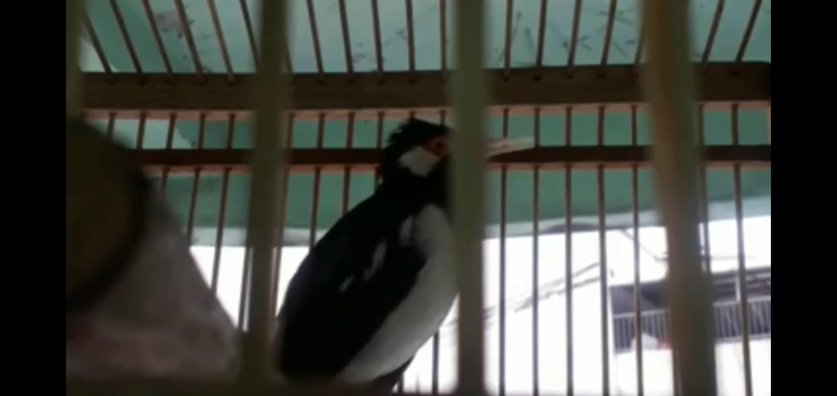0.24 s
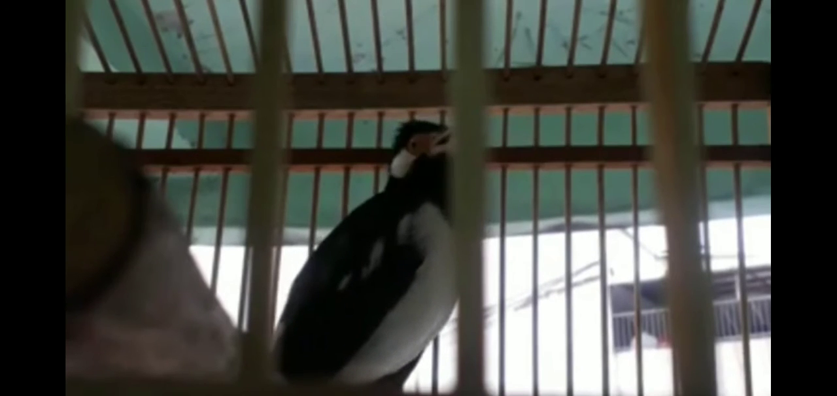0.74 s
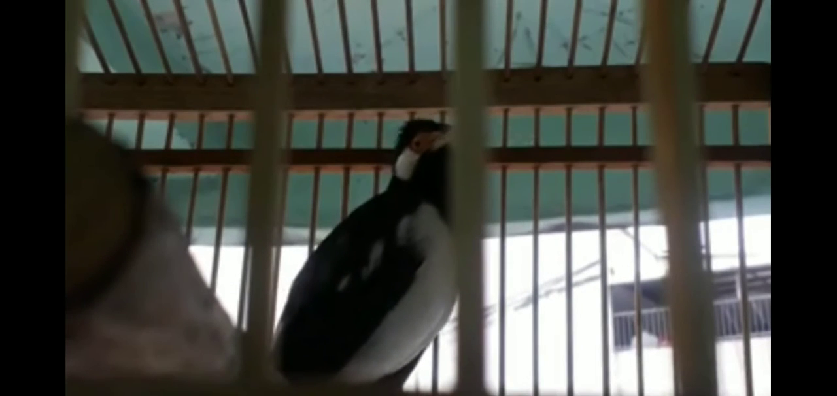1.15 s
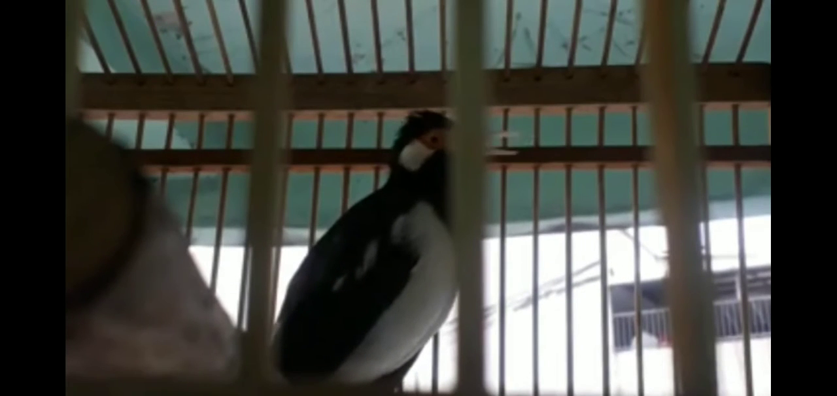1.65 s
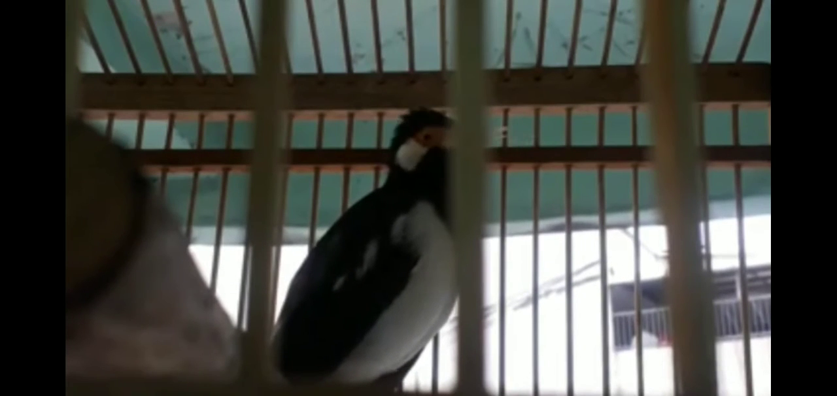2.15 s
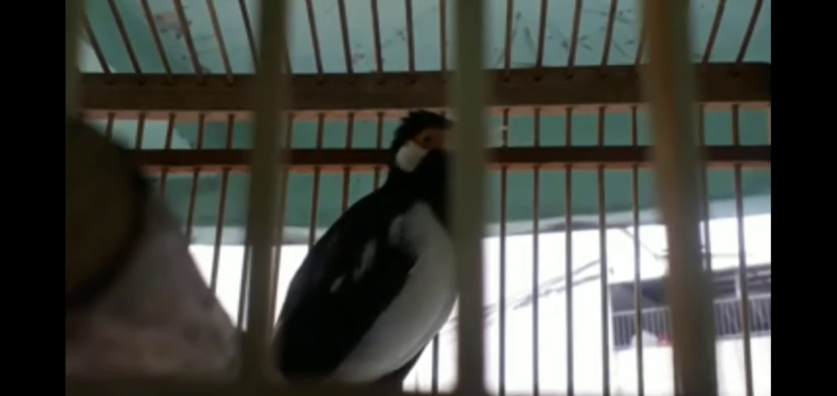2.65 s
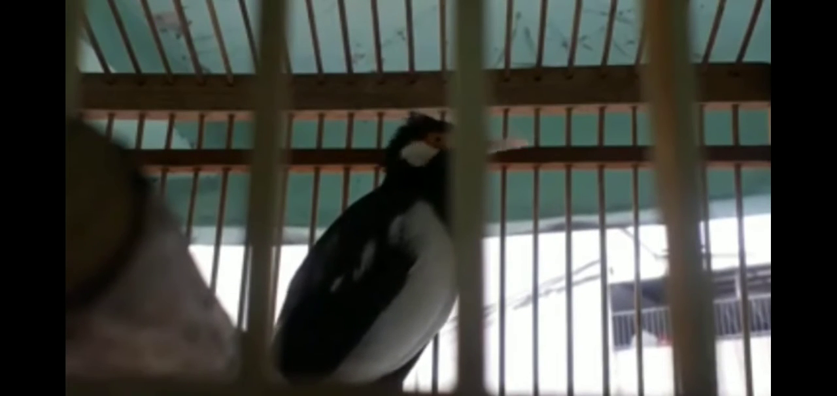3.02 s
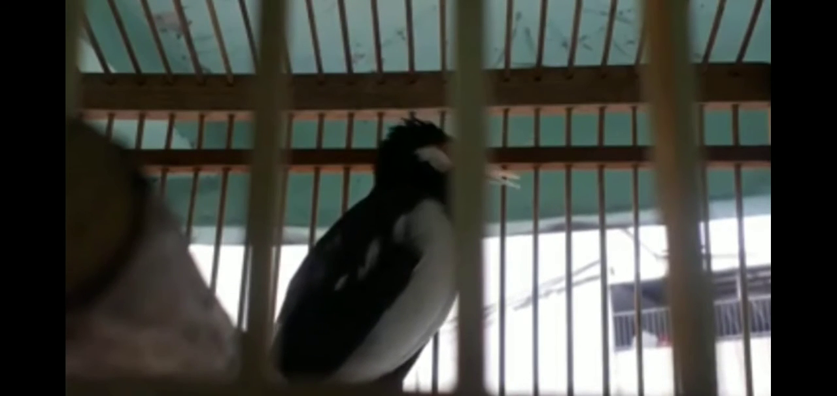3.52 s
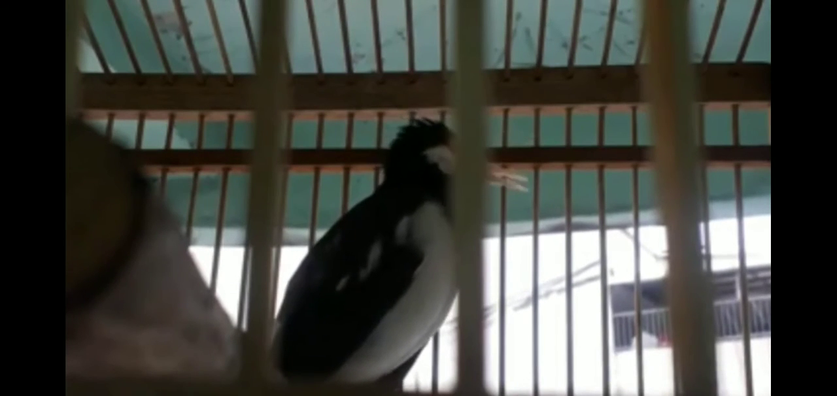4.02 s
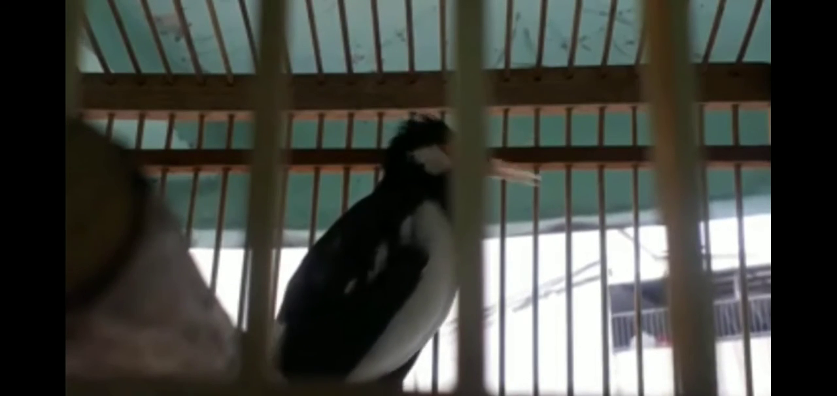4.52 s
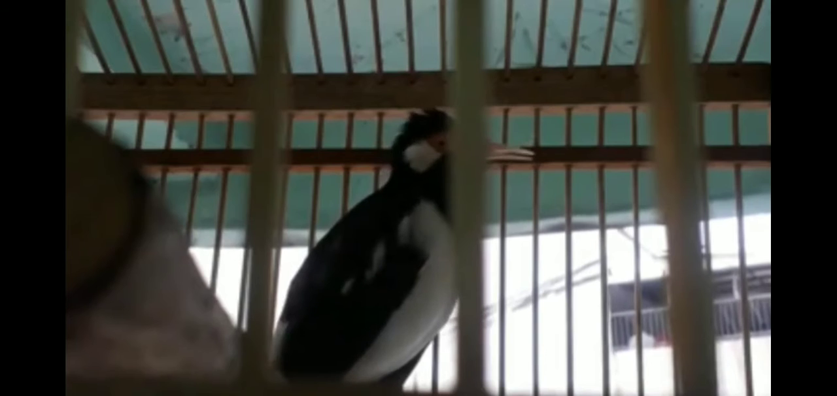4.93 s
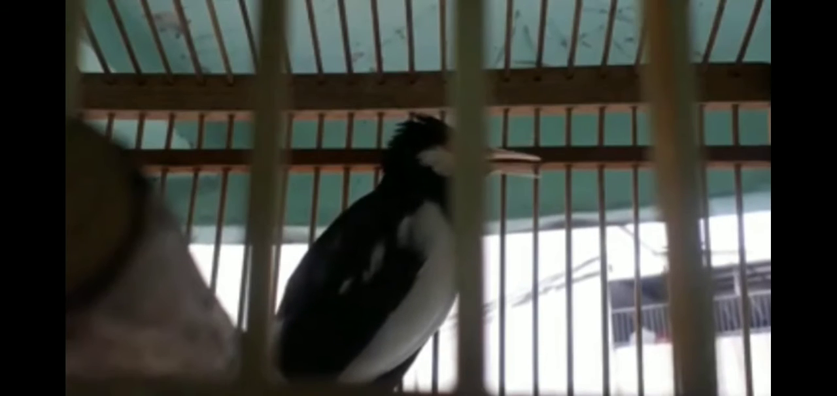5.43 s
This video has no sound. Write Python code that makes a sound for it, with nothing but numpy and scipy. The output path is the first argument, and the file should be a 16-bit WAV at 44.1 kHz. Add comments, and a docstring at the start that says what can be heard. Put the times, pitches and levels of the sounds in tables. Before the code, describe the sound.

A caged starling close by sings whistles, chatter, beak clicks, rattles and trills while a dog barks hoarsely in the distance over low town hum.

```python
"""A walled yard under a low town hum, where a caged starling sings close to a phone and a dog barks further off.
The song is swept tones from the syrinx: whistles, glides, chatter, rattles and trills, with ringing beak clicks.
The hoarse barks are uneven pulses through muzzle resonances, the hum is shaped noise, and the walls ring after notes.
The phone samples at 48 kHz and drops samples to reach 44.1 kHz, which mirrors tones around multiples of 3.9 kHz."""
import sys
import numpy as np
from scipy import signal
from scipy.fft import rfft, irfft
from scipy.io import wavfile
from scipy.ndimage import uniform_filter1d

SR = 44100
rng = np.random.default_rng(int(sys.argv[2]) if len(sys.argv) > 2 else 0)


def store_pcm(level_fs):
    """Save levels as 16-bit WAV."""
    pcm = np.round(np.clip(level_fs, -1, 1) * 32767).astype(np.int16)
    wavfile.write(sys.argv[1], SR, np.atleast_2d(pcm).T)


N = 249606
T = np.arange(N) / SR


def undb(db):
    """Level law: 20 dB is a factor of ten in amplitude."""
    return 10 ** (np.asarray(db) / 20)


def band(x, hz, width_hz):
    """Two-pole resonance: gain 1 at the centre, falling off over the given bandwidth."""
    return signal.lfilter(*signal.iirpeak(hz, hz / width_hz, fs=SR), x)


def walk(rate_hz):
    """Slow random modulation: levels held for one period and averaged twice; spread near 0.3."""
    hold = int(SR / rate_hz)
    steps = np.repeat(rng.standard_normal(N // hold + 1), hold)
    return 0.38 * uniform_filter1d(uniform_filter1d(steps, hold), hold)[:N]


def add(out, start_s, x):
    """Superposition: sounds that overlap in time sum their pressures."""
    i = int(start_s * SR)
    out[i:i + len(x)] += x[:N - i]


def echo(x, first_s, t60_s, db, low_hz, damp_hz=7000):
    """Reverberation: dense reflections decay by 60 dB in t60_s, weaker for the highest and lowest tones."""
    t = T[:SR]
    tail = rng.standard_normal(SR) * 1000. ** (-t / t60_s) * (t > first_s)
    tail /= np.sqrt(np.sum(tail ** 2))
    tail = signal.lfilter(*signal.butter(1, [low_hz, damp_hz], "band", fs=SR), tail)
    return undb(db) * signal.fftconvolve(x, tail)[:N]


def town():
    """Spectral shaping of noise: distant traffic and leaves in bands that swell together and flicker alone."""
    # Relative spectrum of the hum: frequency_hz, density_db (per Hz)
    spectrum = [(25, -12.5), (50, -11), (75, -1.5), (130, 2.5), (250, -3), (600, -8), (1300, -4.5),
                (2000, -19.5), (3500, -25.5), (8000, -34.5), (16000, -45)]
    rms_db = -54
    hz_points, db_points = np.transpose(spectrum)
    octave = np.log2(np.arange(N // 2 + 1) * SR / N + 1)
    weight = undb(np.interp(octave, np.log2(hz_points), db_points))
    noise = rfft(rng.standard_normal(N)) * weight
    out, swell = 0, walk(0.2)
    for centre in np.arange(4, 14.6, .5):  # overlapping bands, half an octave apart
        share = np.clip(1 - 2 * np.abs(octave - centre), 0, 1)
        level = undb(.8 * swell + 4.5 * walk(16))
        out = out + level * irfft(noise * share, N)
    return out * undb(rms_db) / np.sqrt(np.mean(out ** 2))


def bark(length_s, pitch_hz):
    """Source and filter: uneven vocal pulses and breath ring in the muzzle; the result has unit RMS."""
    # Muzzle resonances: centre_hz, width_hz (of the first pass), gain_db
    muzzle = [(815, 136, -2.5), (983.6, 76, 7), (1168, 160, -2.5), (1565, 89, -9.5), (2130, 1400, -21.5)]
    t = T[:int(length_s * SR)]
    wobble = 1 + .6 * uniform_filter1d(rng.standard_normal(len(t)), size=200)
    cycles = np.cumsum(pitch_hz * wobble) / SR
    pulses = np.diff(np.floor(cycles), prepend=-1)  # one pulse per whole cycle
    pulses *= undb(4.0 * rng.standard_normal(len(t)))
    breath = .09 * rng.standard_normal(len(t))
    burst = 1 + 0.63 * np.exp(-t / 0.0026)  # the bark bursts out, then holds
    effort = burst * np.clip(np.minimum(t / 0.0015, (length_s - t) / 0.055), 0, 1)
    source = np.pad(effort * (pulses + breath), (0, 2000))  # room to ring out
    voice = 0
    for k, (hz, width, db) in enumerate(muzzle):
        ring = band(band(source, hz, width), hz, 2.1 * width)
        voice = voice + (-1) ** k * undb(db) * ring  # neighbours in opposite phase
    return voice / np.sqrt(np.mean(voice ** 2))


def dog():
    """Propagation loss: fences and air thin the barks, and distance leaves mostly echo."""
    # Barks: start_s, level_db (RMS before the thinning), length_s, pitch_hz (mean, before the wobble)
    barks = [(0.207, -28.5, 0.12, 255), (0.641, -31.5, 0.14, 255.6), (0.974, -33, 0.13, 259.3),
             (1.259, -32.5, 0.12, 255.7), (3.889, -39, .17, 251.4), (4.984, -37, 0.16, 253.2),
             (5.514, -51, .1, 265)]
    # Echo of the distant barks: first_return_s, t60_s, level_db (before its filter), low_edge_hz
    far_echo = (.004, .7, 1.5, 300)
    out = np.zeros(N)
    for start_s, db, length_s, hz in barks:
        add(out, start_s, undb(db) * bark(length_s, hz))
    out = signal.sosfilt(signal.butter(2, [720, 3200], "band", fs=SR, output="sos"), out)
    return out + echo(out, *far_echo, damp_hz=2970)


def click(db):
    """Impulse response: two quick contacts of the beak ring its short resonances, to a peak of db."""
    # Beak resonances: centre_hz, width_hz (of each of two passes), gain_db
    beak = [(1910, 1170, 10), (2480, 490, 7.5), (3780, 760, -17.5)]
    hit = np.zeros(600)
    hit[[0, 75]] = .6, 1  # contacts 1.7 ms apart
    ring = sum(undb(gain) * band(band(hit, hz, width), hz, width) for hz, width, gain in beak)
    return undb(db) * ring / np.abs(ring).max()


def splutter(db, decay_s=0.017):
    """Turbulence: the plunge of a chatter note breaks up into a grainy, resonant burst of air."""
    t = T[:1500]
    grain_levels = np.repeat(rng.standard_normal(50), 30)
    grains = rng.standard_normal(len(t)) * undb(4.7 * grain_levels)
    upper = band(band(grains, 3600, 2020), 2600, 2010)
    lower = band(band(grains, 2100, 1710), 2100, 1710)
    envelope = np.minimum(t / 0.00031, 1) * np.exp(-t / decay_s)
    return undb(db) * envelope * (upper + 0.81 * lower)


def note(rows, fourth_db=-7.0, edge_s=.002):
    """Harmonic oscillation: the syrinx membrane swings almost as a sine; at low pitch it snaps into overtones."""
    # Pitches that leave throat and cage stronger or weaker: frequency_hz, gain_db
    carry = [(1750, 2.5), (2050, 4), (2350, -2), (2700, -1), (2980, -11), (3250, 3), (3600, -10), (3950, 3),
             (4350, -11), (4750, -4.5), (5400, -22.5), (6200, 7.5)]
    s, hz, db, *over = np.transpose(rows)
    t = np.arange(s[0], s[-1], 1 / SR)

    def smooth(column):
        """Interpolation: straight lines between the rows, with rounded corners."""
        return uniform_filter1d(np.interp(t, s, column), size=130, mode="nearest")

    pitch = smooth(hz)
    phase = 2 * np.pi * np.cumsum(pitch) / SR
    tone = np.sin(phase)
    if over:
        second, third = (undb(smooth(column)) for column in over)
        tone += second * np.sin(2 * phase)
        tone += third * (np.sin(3 * phase) + undb(fourth_db) * np.sin(4 * phase))
        slack = np.clip((1250 - pitch) / 450, 0, 1)  # the slack membrane beats unevenly
        tone *= 1 + 2.2 * slack * uniform_filter1d(rng.standard_normal(len(t)), size=14)
    else:
        tone += undb(-26.5) * np.sin(2 * phase)
        tone *= undb(np.interp(pitch, *np.transpose(carry)))
    edges = np.clip(np.minimum(t - s[0], s[-1] - t) / edge_s, 0, 1)
    return np.sqrt(2) * undb(smooth(db)) * edges * tone


def dive(start_s, length_s, top_hz, floor_hz, sink_s, db):
    """Exponential relaxation: pitch sinks ever more slowly to a floor, loudest part of the way down."""
    u = np.arange(25) / 24
    pitch = floor_hz + (top_hz - floor_hz) * np.exp(-u * length_s / sink_s)
    level = db + np.interp(u, [0, 0.22, 1], [-7.5, 0, -2.5])
    return np.c_[start_s + u * length_s, pitch, level]


def pip(length_s, first_hz, mid_hz, last_hz, db, rise, fall, rasp, second_db, haste=0.91):
    """Frequency modulation: one puff of air bends through three pitches while it swells and dies."""
    u = np.arange(int(length_s * SR)) / (length_s * SR)
    curve = np.polyfit([0, .5, 1], [first_hz, mid_hz, last_hz], deg=2)
    bend = np.polyval(curve, u ** haste)  # haste under 1: the bend comes early
    phase = 2 * np.pi * np.cumsum(bend) / SR
    shape = np.sin(np.pi / 2 * np.clip(np.minimum(u / rise, (1 - u) / fall), 0, 1)) ** 2
    # the membrane loses its beat
    flutter = 1 + rasp * u * uniform_filter1d(rng.standard_normal(len(u)), size=12)
    tone = np.sin(phase) + undb(second_db) * np.sin(2 * phase)
    return np.sqrt(2) * undb(db) * shape * flutter * tone


def sing_whistles(out):
    """Continuous phonation: steady air keeps the membrane swinging through whistles, glides and dives."""
    # Whistles, short and long, one table a note: time_s, pitch_hz, level_db (before the carry)
    whistles = [
        [(0.766, 3970, -23), (0.772, 4684, -18), (0.78, 4920, -23), (0.82, 4360, -27.5), (0.86, 4158, -28),
         (0.926, 4044, -31.5), (0.942, 3780, -29), (0.96, 3075, -19), (0.978, 2560, -24), (0.984, 2370, -32)],
        [(1.517, 2127, -31.5), (1.522, 2497, -36), (1.532, 3834, -19), (1.54, 4065, -23), (1.549, 4076, -19.5),
         (1.562, 2544, -20.5), (1.565, 2580, -36)],
        [(1.632, 2575, -25), (1.64, 3300, -29.5), (1.651, 3883, -24), (1.66, 3890, -18), (1.666, 3420, -19.5),
         (1.675, 3100, -24.5), (1.685, 3240, -37)],
        [(2.987, 4775, -21), (2.999, 4633, -17), (3.008, 4104, -23.5), (3.014, 3360, -52), (3.021, 3280, -21),
         (3.028, 2950, -35), (3.036, 2740, -40), (3.046, 2670, -22.5)],
        [(3.094, 3870, -24), (3.101, 3970, -22), (3.107, 3800, -42), (3.114, 3260, -24), (3.123, 3130, -23.5),
         (3.131, 2930, -48), (3.144, 2970, -1)],
        [(3.3, 2904, -52), (3.315, 2905, -22.5), (3.354, 2688, -27), (3.388, 2698, -16), (3.4, 2666, -21.5),
         (3.407, 2280, -25.5)],
        [(3.846, 1896, -36), (3.858, 3843, -21.5), (3.868, 3940, -25), (3.882, 3787, -24), (3.896, 2686, -19.5),
         (3.913, 2346, -19), (3.928, 2183, -45), (3.94, 2113, -30.5), (3.968, 2650, -27.5), (3.98, 3190, -16),
         (3.991, 3385, -23), (4.013, 2990, -21.5), (4.023, 2530, -21.5), (4.045, 2322, -22.5),
         (4.067, 2417, -22.5), (4.085, 2716, -27), (4.094, 3226, -23.5), (4.106, 3115, -14.5),
         (4.126, 3150, -32), (4.145, 2797, -19), (4.165, 2338, -26), (4.178, 2364, -19.5), (4.2, 2000, -41)],
        [(4.664, 2435, -36), (4.675, 2432, -44), (4.7, 2518, -32.5), (4.72, 2408, -34), (4.735, 2393, -33)],
    ]
    # Low glides, one table a note: time_s, pitch_hz, level_db, second_db, third_db (partials over the first)
    glides = [
        [(0.0, 2291, -32.5, 4, -20), (0.029, 2468, -25.5, -17, -50.5), (0.055, 2384, -22.5, -26.5, -49),
         (0.068, 2195, -30.5, -17, -37), (0.074, 1995, -34.5, -11.5, -27), (0.08, 1730, -35.5, -8, -30),
         (0.09, 1576, -40.5, 2.5, -25)],
        [(2.017, 748, -53.5, -5, 5.5), (2.036, 867, -45, 8, 11.5), (2.055, 1006, -33.5, -5, -21),
         (2.097, 1273, -33.5, 15.5, -20.5), (2.118, 1305, -48.5, 20, 5.5), (2.146, 1584, -35.5, 7, -17),
         (2.178, 1908, -28.5, -16, -30.5), (2.19, 2025, -36, -4, -29), (2.217, 2254, -20, -35, -45.5),
         (2.228, 2285, -34.5, -18, -45), (2.241, 2290, -15, -41, -25), (2.255, 2236, -24, -29, -46),
         (2.264, 2285, -20, -33, -49), (2.335, 2479, -15.5, -43, -47), (2.36, 2412, -23.5, -45, -38),
         (2.374, 2517, -28, -31, -45), (2.388, 2546, -13.5, -40, -43), (2.404, 2534, -71, -16, -26)],
    ]
    # Dives: start_s, length_s, top_hz, floor_hz, sinking_time_s, level_db (loudest point, before the carry)
    dives = [(0.753, 0.014, 4310, 2260, 0.012, -21), (0.984, 0.031, 1950, 1610, 0.0091, -30.5),
             (3.408, 0.014, 2063, 1922, 0.0062, -26.5), (3.425, 0.013, 1924, 1666, 0.016, -24),
             (1.772, 0.026, 5950, 3406, 0.017, -15.5), (2.562, 0.076, 6440, 3432, .016, -21),
             (2.715, 0.05, 6350, 3173, 0.016, -23), (3.178, 0.048, 4155, 2627, .022, -24),
             (3.253, 0.049, 4244, 2712, 0.031, -22.5), (5.181, 0.022, 4860, 3900, 0.029, -30)]
    for rows in whistles + glides + [dive(*row) for row in dives]:
        add(out, rows[0][0], note(rows))


def sing_upstrokes(out):
    """Rising tension: faint upward sweeps lead into the next note."""
    # Upstrokes: start_s, length_s, first_hz, last_hz, level_db
    upstrokes = [(0.425, 0.0055, 4630, 5274, -35), (0.558, 0.0072, 4260, 5140, -23.5),
                 (0.749, 0.0089, 2690, 4220, -29.5), (3.047, 0.059, 2450, 5340, -34),
                 (3.149, .03, 2876, 5210, -32), (3.228, .028, 2786, 5280, -37)]
    for start_s, length_s, first, last, db in upstrokes:
        middle = first + .7 * (last - first)  # most of the climb comes early
        add(out, start_s, pip(length_s, first, middle, last, db, rise=.3, fall=0.31, rasp=1.42, second_db=-22.5))


def sing_pips(out):
    """Transient onset: the membrane pops open with a tick at the start of each low pip.

    The pips come in rattles or in short uneven runs."""
    # Low pips: start_s, length_s, pitch_hz (middle), level_db
    pips = [(1.03, 0.023, 1660, -31), (1.306, 0.012, 1050, -28), (1.322, 0.015, 1070, -54),
            (1.347, .017, 1108, -38), (1.365, 0.0081, 1220, -28), (1.387, 0.013, 1194, -28),
            (1.41, 0.016, 1284, -29.5), (3.439, 0.018, 1101, -25), (3.45, 0.026, 1634, -31),
            (3.474, .011, 1069, -26.5), (3.503, 0.011, 885, -37.5), (3.648, 0.0097, 1147, -28.5),
            (3.673, 0.0097, 1185, -31), (3.697, 0.012, 1200, -30.5), (3.721, 0.014, 1150, -32),
            (3.744, 0.015, 1138, -35), (4.202, 0.024, 1723, -26), (4.226, 0.021, 1140, -22.5),
            (4.245, .013, 1670, -29), (4.26, .021, 1069, -25.5), (4.443, 0.0091, 1208, -29.5),
            (4.47, 0.0087, 1174, -28.5), (4.495, 0.012, 1255, -29.5), (4.518, 0.026, 1323, -34),
            (4.55, 0.0053, 1275, -26), (4.579, 0.022, 1495, -31.5), (4.606, 0.022, 1496, -30),
            (4.635, 0.026, 1337, -33), (4.663, 0.011, 1283, -32)]
    for start_s, length_s, hz, db in pips:
        body = pip(length_s, hz * .97, hz, hz * 0.99, db, rise=0.46, fall=0.52, rasp=0.4, second_db=-30.5)
        pop = pip(0.0033, hz * 1.083, hz * 1.083, hz, db - 6, rise=0.38, fall=0.37, rasp=0, second_db=-19)
        for part in (body, pop, click(db - 11.0)):
            add(out, start_s, part)


def sing_trills(out):
    """Periodic gesture: repeated strokes dive and curl up; most low ones get a faint rising answer."""
    # Strokes of each trill: start_s, top_hz, lowest_hz (mid-bend), level_db
    low_trill = [(5.202, 4570, 4266, -30), (5.215, 4400, 4140, -23.5), (5.237, 4390, 3953, -22),
                 (5.26, 4570, 3975, -24.5), (5.284, 4520, 3977, -22), (5.311, 4444, 3983, -22.5),
                 (5.337, 4480, 3990, -21.5), (5.365, 4440, 3970, -20), (5.393, 4455, 4100, -27)]
    high_trill = [(5.488, 6130, 4620, -33), (5.514, 5990, 4760, -26), (5.544, 5500, 4810, -23.5),
                  (5.573, 5504, 4713, -22), (5.603, 5734, 4896, -26.5), (5.633, 5950, 4850, -25.5)]
    for start_s, top, hz, db in low_trill:
        add(out, start_s, pip(0.0161, top, hz, 1.008 * hz, db, rise=0.13, fall=0.7, rasp=0.085,
                              second_db=-30, haste=0.854))
    for start_s, top, hz, db in high_trill:
        add(out, start_s, pip(.033, top, hz, 1.09 * hz, db, rise=0.23, fall=0.33, rasp=0.41,
                              second_db=-30, haste=.9))
    for start_s, *_, db in low_trill[1:-1]:
        add(out, start_s + .015, pip(.012, 4110, 4410, 4470, db - 12.5, rise=0.25, fall=0.28, rasp=.1,
                                     second_db=-22))


def sing_chatter(out):
    """Loss of oscillation: a high tone plunges, then breaks up into a burst of air."""
    # Chatter notes: start_s, length_s, top_hz, level_db (of the tone)
    chatter = [(0.297, 0.017, 5400, -28), (.362, 0.019, 5250, -24.5), (.431, .019, 5050, -21.5),
               (0.494, 0.031, 5700, -24), (.564, .02, 5060, -22), (.631, 0.014, 4920, -25)]
    for start_s, length_s, hz, db in chatter:
        add(out, start_s, pip(length_s, hz, .86 * hz, 1530, db, rise=0.46, fall=0.34, rasp=1.36,
                              second_db=-28, haste=1.1))
        add(out, start_s + .7 * length_s, splutter(db + 4.2))


def starling():
    """Amplitude modulation: an air stream that is never quite even carries the whole dry song."""
    # Beak clicks: start_s, peak_db (before the uneven air stream)
    clicks = [(0.747, -30), (1.2331, -18.5), (2.016, -42), (3.601, -20), (3.843, -27), (4.4015, -20.5)]
    out = np.zeros(N)
    for sing in (sing_whistles, sing_upstrokes, sing_pips, sing_trills, sing_chatter):
        sing(out)
    for start_s, db in clicks:
        add(out, start_s, click(db))
    return out * undb(1.5 * walk(90))


def scene():
    """Direct and reflected sound: the song with its early bounces and echoes joins the dog and the town."""
    # Bounces from cage floor, roof and wall: lag_s, level_db (over the dry song)
    bounces = [(.0014, -9), (.0030, -14), (.0042, -15), (.0094, -15)]
    # Nearby walls, then the open yard beyond: first_return_s, t60_s, level_db (before its filter), low_edge_hz
    echoes = [(.006, 0.166, -5.5, 1850), (0.018, .7, -12.5, 500)]
    bird = starling()
    near = undb(2.0) * bird
    for lag_s, db in bounces:
        add(near, lag_s, undb(db) * bird)
    reverberation = sum(echo(bird, *settings) for settings in echoes)
    return (near + reverberation + dog() + town())[None]


def record(dry):
    """Aliasing: of 48 kHz samples the nearest earlier one is kept for each 44.1 kHz tick; the top is cut."""
    fast = signal.resample_poly(dry, 160, 147, axis=1)
    kept = fast[:, np.arange(N) * 160 // 147]
    top_hz = 16000
    return signal.sosfilt(signal.ellip(10, .2, 80, top_hz, fs=SR, output="sos"), kept)


dry = scene()
out = record(dry)
store_pcm(out)
```